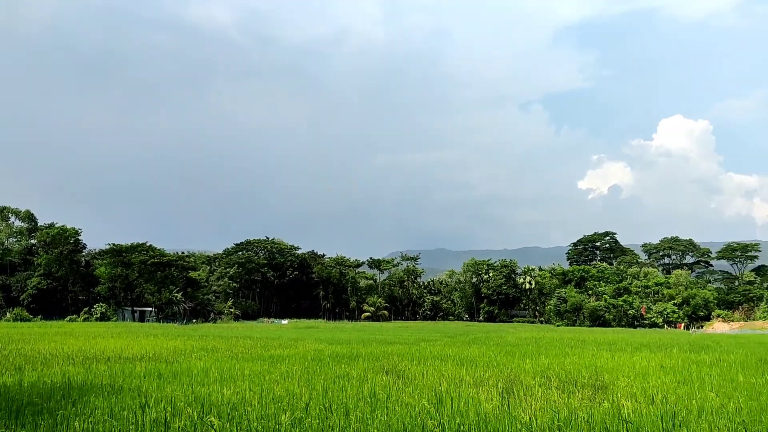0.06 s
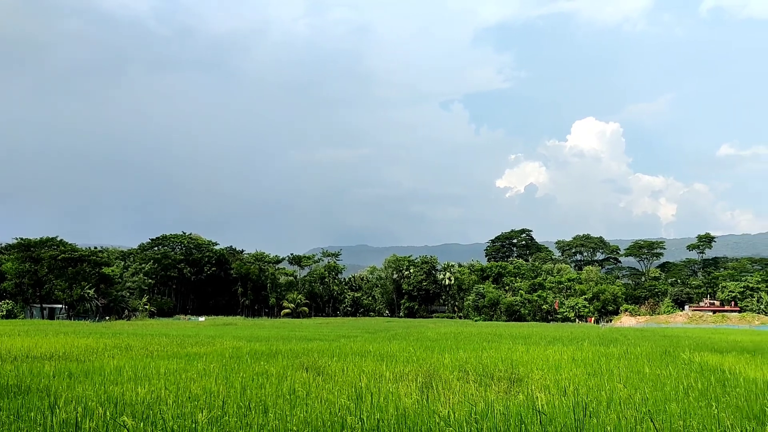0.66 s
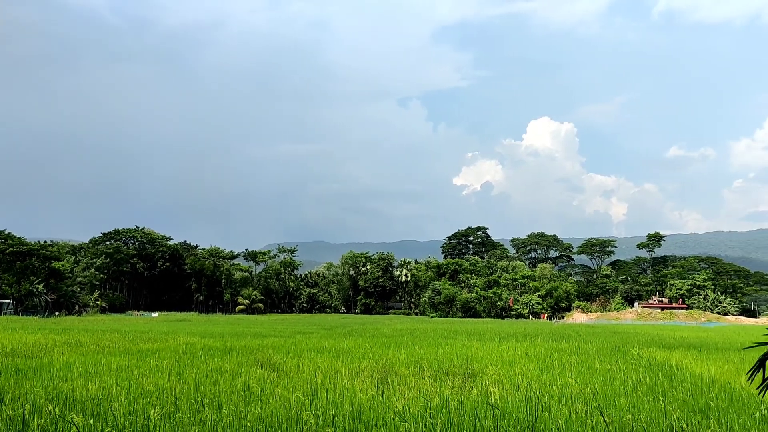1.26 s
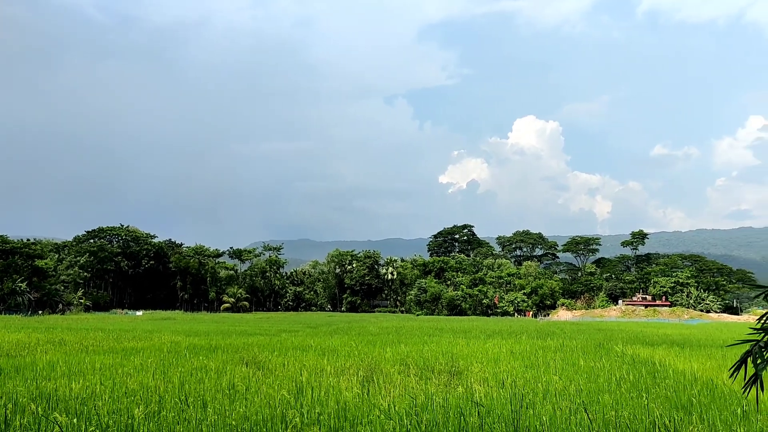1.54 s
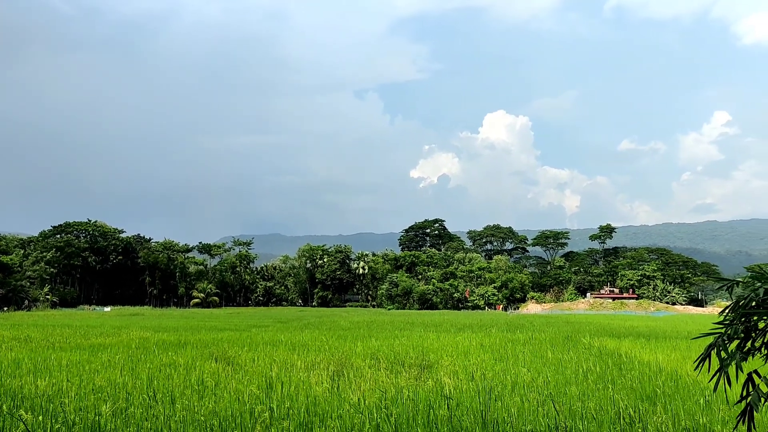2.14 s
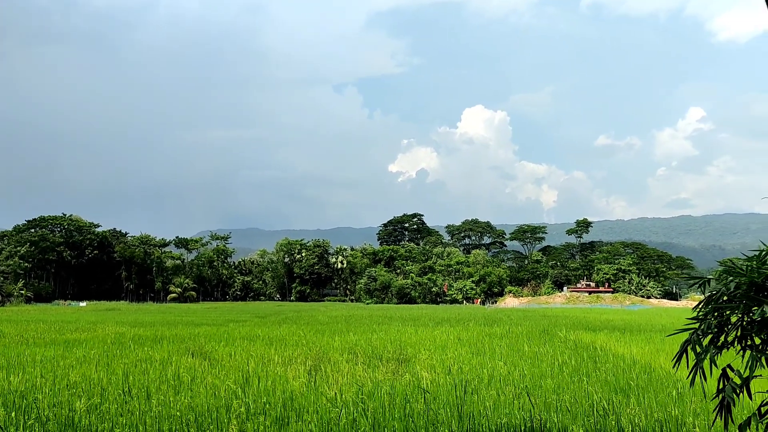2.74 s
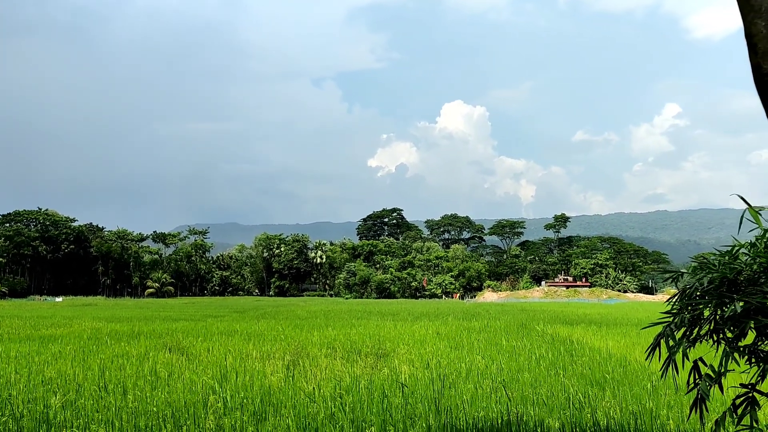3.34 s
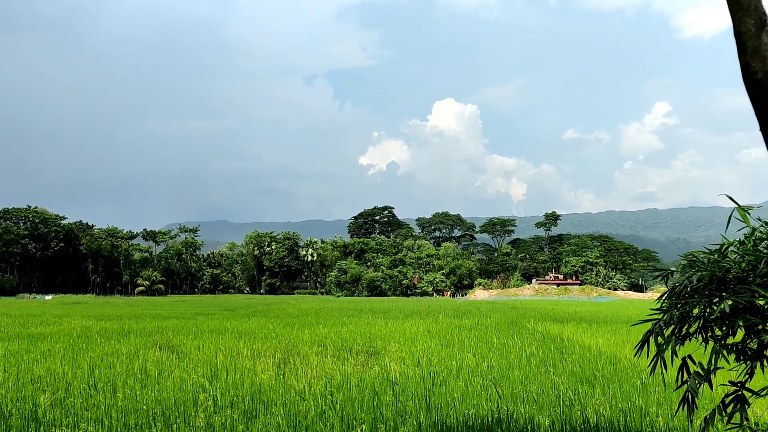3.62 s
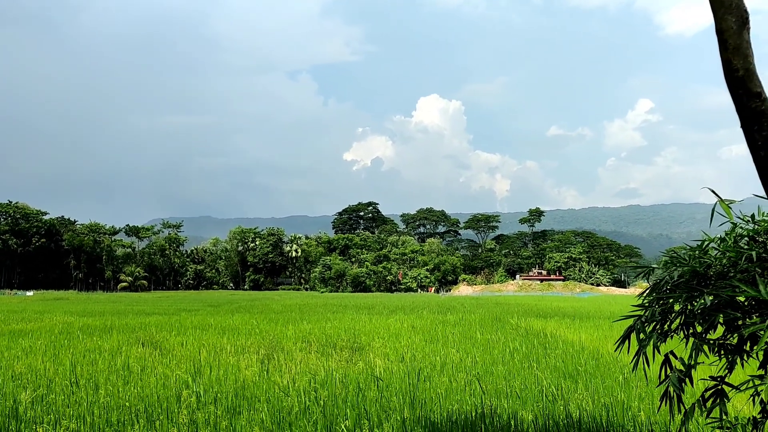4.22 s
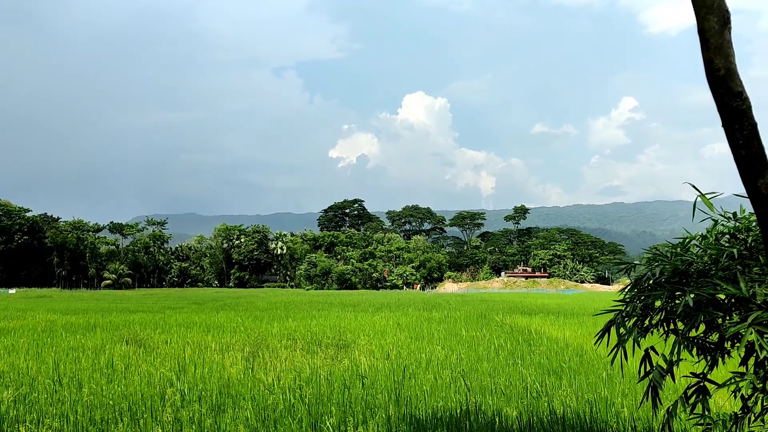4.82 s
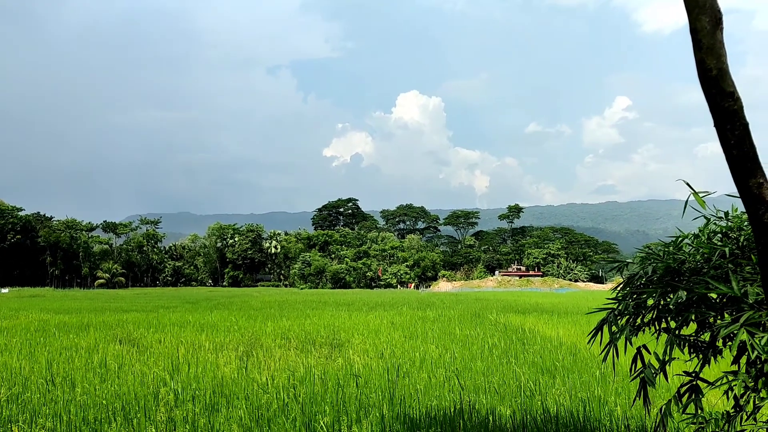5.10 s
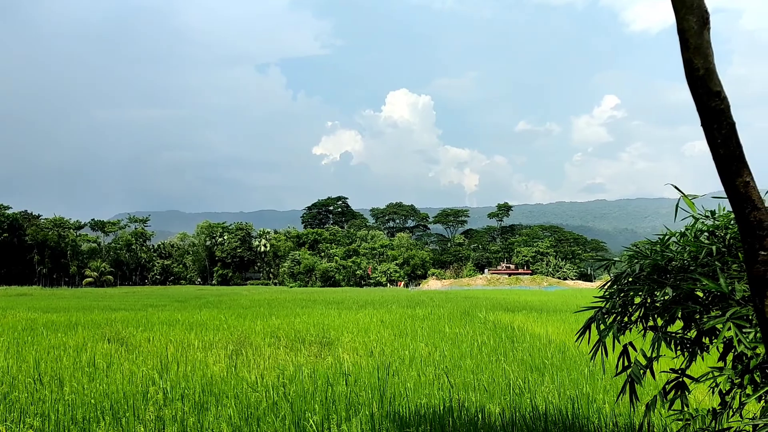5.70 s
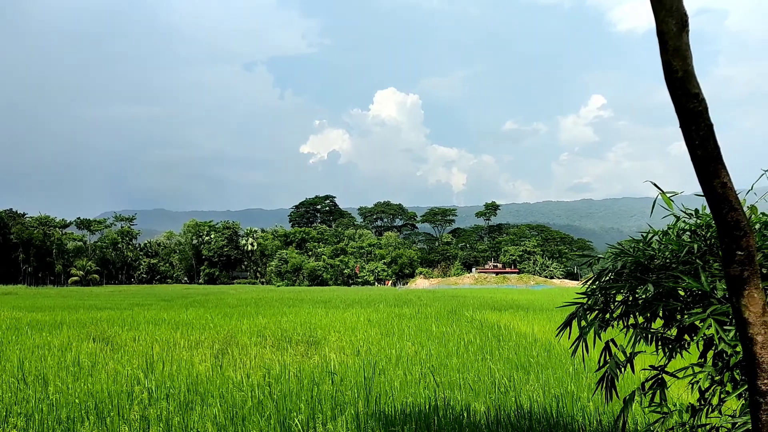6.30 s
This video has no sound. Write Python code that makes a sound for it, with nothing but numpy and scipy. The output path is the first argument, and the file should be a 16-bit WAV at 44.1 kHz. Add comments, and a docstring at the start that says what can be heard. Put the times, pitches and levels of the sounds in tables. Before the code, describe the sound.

At the edge of a rice field, wind rumbles unevenly on the microphone, swelling at the start and later thumping mostly on the left. A small bird nearby repeats quick bursts of high, rising, slightly raspy chirps, with a light echo off the trees. Underneath lie a steady country hush, the faint low drone of a far road, a soft high sizzle and faint distant bird whistles.

```python
"""Gusts rumble and thump on two microphone ports, mostly the left, at the edge of a rice field.
Under the wind lie the hush of open country, the drone of a far road and, from the tree line, a soft
sizzle and faint bird whistles. A small bird close by repeats quick bursts of upslurred, slightly
raspy chirps, which scatter off twigs, foliage and trees."""
import sys
import numpy as np
from scipy import signal
from scipy.fft import rfft, irfft, next_fast_len
from scipy.io import wavfile
from scipy.ndimage import uniform_filter1d, map_coordinates

SR = 44100
rng = np.random.default_rng(int(sys.argv[2]) if len(sys.argv) > 2 else 0)


def wav_out(sig):
    """Save sig, one row per channel (or a flat mono array), as 16-bit PCM at SR to the path in sys.argv[1]."""
    wavfile.write(sys.argv[1], SR, np.round(np.clip(np.atleast_2d(sig).T, -1, 1) * 32767).astype(np.int16))


N = 280299
TIME_S = np.arange(N) / SR

# Single eddies hitting the ports. Each row: time in seconds, left peak in dB, width in seconds,
# right minus left in dB.
EDDY_HITS = [(0.140, -20, 0.0068, -2), (0.411, -20, 0.0048, -2), (2.614, -25, 0.0023, -1),
             (2.658, -19, 0.0055, -8), (2.689, -24, 0.0022, -2), (2.904, -15.5, 0.004, -16),
             (2.924, -20, 0.0061, -15), (3.035, -13, 0.0045, -18), (3.057, -14, 0.005, -13),
             (3.079, -9, 0.0037, -19), (3.114, -14, 0.0032, -25), (3.192, -15, 0.0043, -24),
             (3.215, -14, 0.0037, -24), (3.264, -21, 0.0049, -18), (3.515, -12.5, 0.0095, -27),
             (3.542, -12.5, 0.0044, -23), (3.721, -12, 0.0029, -32), (3.765, -19.5, 0.0033, -19),
             (3.82, -24, 0.0015, -5), (3.938, -12.5, 0.0042, -28), (4.063, -13, 0.007, -19),
             (4.092, -17, 0.0047, -15), (4.146, -10, 0.0054, -28), (4.46, -13.5, 0.0054, -23),
             (4.489, -19, 0.0035, -27), (4.684, -13, 0.0076, -22)]


def from_db(db):
    return 10 ** (np.asarray(db) / 20)


def unit_rms(x):
    return x / np.sqrt(np.mean(x ** 2) + 1e-20)


def per_sample(rows):
    """Interpolate rows of (seconds, values..) to one curve per value column."""
    times_s, *columns = np.transpose(rows)
    return [np.interp(TIME_S, times_s, column) for column in columns]


def pan(left_right_db):
    """Constant-power left and right gains."""
    gains = from_db(np.array([[.5], [-.5]]) * left_right_db)
    return gains / np.sqrt(np.mean(gains ** 2, axis=0))


def coloured(x, spectrum):
    """Filter by rows of (Hz, dB), joined on a log-frequency axis."""
    hz, db = np.transpose(spectrum)
    size = next_fast_len(x.shape[-1])
    bins_hz = np.maximum(np.fft.rfftfreq(size, 1 / SR), 1)
    gain = from_db(np.interp(np.log(bins_hz), np.log(hz), db))
    return irfft(rfft(x, size) * gain, size)[..., :x.shape[-1]]


def drift(rate_hz, count):
    """Smooth random wander, spread near 1."""
    steps = np.arange(count) * rate_hz / SR
    return map_coordinates(rng.standard_normal(int(steps[-1]) + 2), [steps], order=2, mode="nearest")


def add(track, start_s, sound):
    at = round(start_s * SR)
    first, last = max(at, 0), min(at + sound.shape[-1], N)
    track[..., first:last] += sound[..., first - at:last - at]


def turbulence(spectrum, coherence):
    """Pressure noise at two ports, partly shared, held near unit power."""
    shared, *own = rng.standard_normal((3, N))
    pressure = coloured(np.sqrt(coherence) * shared + np.sqrt(1 - coherence) * np.array(own), spectrum)
    return pressure / np.sqrt(uniform_filter1d(pressure ** 2, size=SR // 7, axis=1))


def wind(rumble_trim_db=1.5, buffet_db=2.0, strong_gust_db=-28, wake_db=6.5, wake_s=0.015):
    """Large eddies rumble and small ones flutter as a gust grows, both louder at the windward port."""
    # Each row: time in seconds, gust level in dB, left minus right in dB.
    gusts = [(0.0, -28, 4), (0.56, -35.5, -4), (0.76, -33, -2), (0.88, -40.5, 4), (1.11, -36, 0),
             (1.17, -32.5, 9), (1.43, -30.5, 3), (1.53, -35.5, 0), (2.0, -37, 4), (2.3, -35, 8),
             (2.55, -34, 3), (2.68, -31.5, 4), (2.82, -36, 4), (2.91, -34.5, 10), (2.97, -34, -1),
             (3.04, -30, 15), (3.55, -26.5, 11), (3.9, -30, 8), (4.0, -31.5, 0), (4.12, -31.5, 14),
             (4.22, -32, 10), (4.39, -35, 4), (4.46, -26, 20), (4.62, -35, 8), (4.69, -27, 18),
             (4.78, -39.5, 3), (6.2, -40, 0), (6.36, -44, -6)]
    # Large-eddy spectrum. Each row: frequency in Hz, relative density in dB.
    rumble_spectrum = [(8, -23), (18, -3.5), (30, 3), (50, -4), (75, -9.5), (110, -15), (170, -30),
                       (300, -60), (700, -79.5)]
    # Small-eddy spectrum. Each row: frequency in Hz, relative density in dB.
    flutter_spectrum = [(35, 2), (80, -31), (130, -1.5), (200, -21.5), (330, -26.5), (600, -43),
                        (1500, -77)]
    gust_db, left_right_db = per_sample(gusts)
    shoves_db = buffet_db * drift(18, N)
    rumble = from_db(gust_db + rumble_trim_db + shoves_db) * turbulence(rumble_spectrum, coherence=.45)
    # Each thump comes in a brief flurry of small eddies.
    wakes = sum(np.exp(-((TIME_S - at_s) / wake_s) ** 2) for at_s, *_ in EDDY_HITS)
    flutter_db = -46.5 + 1.4 * (gust_db - strong_gust_db) + wake_db * wakes
    flutter = from_db(flutter_db) * turbulence(flutter_spectrum, coherence=.6)
    return pan(left_right_db) * (rumble + flutter)


def head_on_gust(hold_db=-28, from_s=0.17, until_s=0.52, rise_db_per_s=81, fall_db_per_s=19):
    """One gust meets both ports equally: it swells, holds and dies away."""
    # Each row: frequency in Hz, relative density in dB.
    spectrum = [(12, -9), (30, 20), (55, 1.5), (80, -3.5), (140, -1.5), (185, -6), (240, -8), (320, -18),
                (600, -29.5), (1500, -100)]
    rise_db = rise_db_per_s * np.maximum(from_s - TIME_S, 0)
    fall_db = fall_db_per_s * np.maximum(TIME_S - until_s, 0)
    return from_db(hold_db - rise_db - fall_db) * turbulence(spectrum, coherence=.8)


def country_hush(level_db=-44):
    """Distant hush, alike at both ports in the bass, diffuse in the treble."""
    # Each row: frequency in Hz, relative density in dB.
    spectrum = [(20, -4), (90, 0.5), (160, -2.5), (260, -2), (430, -7.5), (780, -10.5), (950, -16.5),
                (1200, -14), (1900, -19.5), (3100, -30.5), (4000, -36.5), (5000, -39), (8000, -42.5),
                (12000, -41.5), (15500, -44.5)]
    # Stereo width. Each row: frequency in Hz, side minus mid in dB.
    width = [(40, -38), (150, -43), (280, -10.5), (500, -5.5), (780, -5.5), (980, -2), (1300, 2.5),
             (2600, -1), (4000, 1.5), (15000, -0.5)]
    mid, side = rng.standard_normal((2, N))
    field = mid + coloured(side, width) * [[1], [-1]]
    flat_field = coloured(field, [(hz, -10 * np.log10(1 + from_db(db) ** 2)) for hz, db in width])
    return from_db(level_db) * unit_rms(coloured(flat_field, spectrum))


def far_road():
    """Only the low drone of distant engines carries across the field."""
    # Each row: time in seconds, level in dB.
    levels = [(0, -61), (2.0, -53.5), (3.5, -53.5), (5.0, -52.5), (5.7, -52.5), (6.36, -49)]
    # Each row: frequency in Hz, relative density in dB.
    spectrum = [(120, -23), (190, -3.5), (245, 3.5), (300, -1), (370, -3), (432, 6), (470, -43),
                (800, -15.5), (2000, -46)]
    return from_db(per_sample(levels)[0]) * unit_rms(coloured(rng.standard_normal(N), spectrum))


def sizzle():
    """A soft high sizzle from the tree line comes and goes, unrelated at the two ports."""
    # Each row: time in seconds, level in dB.
    levels = [(0, -72.5), (1.5, -74.5), (1.75, -80), (2.1, -84), (2.4, -72.5), (3.4, -74.5), (4.4, -73),
              (5.8, -75), (6.1, -71.5), (6.36, -77)]
    # Each row: frequency in Hz, relative density in dB.
    spectrum = [(2500, -28), (3600, 0.5), (4500, 1.5), (5200, -9), (6500, -3), (9000, -30)]
    return from_db(per_sample(levels)[0]) * unit_rms(coloured(rng.standard_normal((2, N)), spectrum))


def scatter(x, t60_s, build_s):
    """Many weak returns from leaves and trunks build up and die away."""
    t = np.arange(SR) / SR
    returns = rng.standard_normal((2, SR)) * from_db(-60 * t / t60_s) * (1 - np.exp(-t / build_s))
    returns /= np.sqrt(np.sum(returns ** 2, axis=1, keepdims=True))
    return signal.fftconvolve(x[None], returns, axes=1)[:, :N]


def far_birds(chorus_db=-68, twitter_db=-74, count=20, waver=.035):
    """Wavering, gliding calls among faint whistles and higher twitters, smeared by distance."""
    # Each row: start in seconds, length in seconds, start pitch in Hz, end pitch in Hz, level in dB.
    whistles = [(-0.06, 0.24, 1420, 1356, -57), (1.16, 0.21, 1360, 1244, -58.5),
                (6.22, 0.14, 1350, 1340, -61)]
    # Soft upslurs of small birds; columns as in whistles.
    upslurs = [(5.577, 0.21, 2600, 2850, -72), (5.88, 0.24, 2650, 3100, -71.5),
               (5.988, 0.04, 3270, 4850, -68), (6.07, 0.036, 3500, 5170, -72),
               (6.16, 0.15, 2510, 2850, -68)]
    chorus = [(when * N / SR, 0.072 + 0.11 * long, 1100 + 250 * high, 1100 + 250 * end, chorus_db)
              for when, long, high, end in rng.random((count, 4))]
    twitters = [(when * N / SR, 0.0393 + 0.078 * long, 1600 + 1300 * high, 1800 + 1300 * high,
                 twitter_db + 6 * (1 - high)) for when, long, high in rng.random((count, 3))]
    calls = np.zeros(N)
    for start_s, length_s, from_hz, to_hz, level_db in whistles + upslurs + chorus + twitters:
        along = np.linspace(0, 1, int(length_s * SR))
        hz = (from_hz + (to_hz - from_hz) * along) * (1 + waver * drift(151.4, len(along)))
        envelope = 2 * from_db(level_db) * np.sin(np.pi * along)
        add(calls, start_s, envelope * np.sin(2 * np.pi * np.cumsum(hz) / SR))
    return scatter(calls, t60_s=.4, build_s=.015)


def chirp(shelf_s, top_s, low_hz, top_hz, low_db, top_db, octave_db):
    """One raspy note: it slides along a low shelf, kinks up to the top pitch and droops as it closes."""
    flat_shelf_hz, shelf_climb_per_s, top_climb_hz_per_s = 4280, 47, 10600
    slur_share, swell_share, close_s = 0.22, 0.32, 0.0026
    droop_hz, droop_s, wander, waver = 450, 0.0026, .011, .03
    flicker_db, rasp_db, throat_hz, leak_db = 2.4, -20, 8600, -29.5
    # Noise skirts from turbulent air. Each row: offset from the note in Hz, relative density in dB.
    rasp_spectrum = [(100, -12), (400, -3), (800, -4), (1400, -5), (3000, -18), (8000, -25), (11000, -37)]
    t = np.arange(int((shelf_s + top_s + close_s / 2) * SR)) / SR
    risen = .5 + .5 * np.tanh((t - shelf_s) / (slur_share * shelf_s))
    shelf_hz = low_hz + shelf_climb_per_s * (flat_shelf_hz - low_hz) * (t - shelf_s / 2)
    crest_hz = top_hz + top_climb_hz_per_s * (t - shelf_s - top_s / 2)
    hz = shelf_hz + (crest_hz - shelf_hz) * risen - droop_hz * np.exp((t - t[-1]) / droop_s)
    # The pitch trembles most on the shelf.
    hz *= 1 + wander * drift(195, len(t)) + waver / (1 + 2 * risen) * drift(734, len(t))
    phase = 2 * np.pi * np.cumsum(hz) / SR
    ramp = np.minimum(t / (swell_share * shelf_s), (t[-1] - t) / close_s)
    opening = np.sin(np.pi / 2 * np.clip(ramp, 0, 1)) ** 2
    level = from_db(low_db + (top_db - low_db) * risen + flicker_db * drift(300, len(t)))
    rasp = from_db(rasp_db) * unit_rms(coloured(rng.standard_normal(len(t)), rasp_spectrum))
    # The throat passes the octave while the pitch is low; above that only a trace leaks through.
    octave = from_db(octave_db) / (1 + (2 * hz / throat_hz) ** 20) + from_db(leak_db)
    return np.sqrt(2) * opening * level * ((1 + rasp) * np.sin(phase) + octave * np.sin(2 * phase))


def twig_echoes(x, first_s=.002, last_s=.04, fade_s=0.015, count=14):
    """Separate early echoes off nearby leaves and branches, a different set at each port."""
    out = np.zeros((2, N))
    for port in out:
        delays_s = first_s + (last_s - first_s) * (np.arange(count) + rng.random(count)) / count
        gains = np.exp(-delays_s / fade_s) * rng.choice([-1, 1], count)
        for delay_s, gain in zip(delays_s, gains / np.linalg.norm(gains)):
            add(port, delay_s, gain * x)
    return out


def near_bird(gain_db=0.8, direct_db=-1.3, twigs_db=-7.5, foliage_db=-9.5, trees_db=-11, lag_s=.00005):
    """Chirps arrive directly and off twigs, foliage and trees; more is echo when the bird turns away."""
    # Each row: upslur time, shelf length and top length in seconds, shelf and top pitch in Hz,
    # then in dB: shelf level, top level, left minus right, octave overtone, echo send.
    chirps = [(0.034, 0.014, 0.015, 4250, 4820, -61, -64, -5, -26, 2),
              (0.085, 0.013, 0.015, 4270, 4830, -60, -65, -2, -26, -1),
              (0.286, 0.0077, 0.011, 3920, 4650, -64, -64, 0, -26, 4),
              (0.329, 0.015, 0.016, 4170, 4780, -62, -57, -5, -26, -2),
              (0.397, 0.006, 0.008, 3300.0, 4500.0, -67.0, -63.0, 3, -26, 1),
              (0.435, 0.0083, 0.01, 3680, 4800.0, -60, -60, 0, -26, 4),
              (0.475, 0.0061, 0.0082, 3860, 4810, -60, -56.5, 1, -30, 2),
              (0.563, 0.0075, 0.015, 3930, 4590, -63, -57.5, -7, -30, 1),
              (0.611, 0.014, 0.02, 4150, 4770, -54, -54.5, -7, -26, -3),
              (0.66, 0.014, 0.016, 4150, 4900, -54, -55, -7, -26, -0.5),
              (0.735, 0.026, 0.02, 3890, 4630, -57.5, -63, -2, -12, -3),
              (0.901, 0.0079, 0.013, 3580, 4670, -58, -61, -6, -26, 3),
              (0.933, 0.0069, 0.0072, 3050, 3820, -61.5, -64, -1, -26, 3),
              (0.947, 0.013, 0.018, 4150, 4720, -58, -55, -7, -26, -2),
              (0.984, 0.013, 0.013, 3850, 5200, -55.5, -55, -1, -26, 2),
              (1.026, 0.0076, 0.01, 3900, 5230, -56, -55.5, -3, -26, -1),
              (1.192, 0.0084, 0.017, 3680, 4600, -61, -60, -4, -31, 1),
              (1.239, 0.012, 0.016, 4160, 4760, -51.5, -57, -7, -23, -2),
              (1.289, 0.014, 0.019, 4150, 4880, -56, -62, -8, -26.5, -3),
              (1.429, 0.011, 0.021, 3330, 4770, -56, -53.5, -8, -13, 0),
              (1.469, 0.014, 0.02, 3800, 5060, -50, -51, -6, -28, 0.5),
              (1.513, 0.016, 0.022, 3850, 5130, -51, -53, -2, -31, 2.5),
              (2.143, 0.0069, 0.022, 3200, 4660, -56, -56.5, 5, -8, 4),
              (2.189, 0.014, 0.013, 3780, 5060, -56, -52, 3, -17, 5),
              (2.231, 0.012, 0.015, 3770, 5060, -58, -54, 7, -18, 3.5),
              (2.545, 0.011, 0.013, 3560, 4830, -58.5, -58, -3, -2.5, 6),
              (2.59, 0.02, 0.018, 4250.0, 4950, -54.5, -52.5, -2, -20, 1.5),
              (2.639, 0.015, 0.011, 4380, 5000, -53, -50.5, -4, -26, -1.5),
              (2.84, 0.006, 0.009, 3480, 4630, -69, -73.0, 5, -26, 10),
              (2.889, 0.02, 0.017, 4000.0, 4750, -68.5, -71, 8, -24, 12),
              (2.941, 0.014, 0.014, 4100.0, 4960, -70, -71, 6, -26, 9),
              (3.076, 0.012, 0.011, 3100, 4590, -60.5, -57, 2, -26, 4),
              (3.119, 0.015, 0.027, 3580, 4800, -53, -53, 1, -18, -7),
              (3.164, 0.014, 0.022, 3730, 5010, -54.5, -58.5, 1, -28, 2.5),
              (3.52, 0.0096, 0.0145, 3750, 4910, -53, -52, -6, -23, 4),
              (3.565, 0.02, 0.015, 4270, 5070, -49.5, -47.5, -5, -27, 0.5),
              (3.613, 0.018, 0.014, 4460, 5140, -48, -44.5, -5, -29, -3),
              (3.863, 0.005, 0.015, 3480, 4520, -63, -57, 1, -26, 0),
              (3.91, 0.01, 0.011, 3960, 4720, -54, -51, 6, -15, 0.5),
              (3.953, 0.015, 0.02, 3600, 4785, -54.5, -53.5, 5, -15, -0.5),
              (3.996, 0.014, 0.018, 3500, 5030, -60, -58, 8, -26, -1),
              (4.165, 0.0071, 0.0097, 3770, 4000, -69, -64, -1, -26, 0),
              (4.654, 0.0089, 0.019, 3520, 4550, -65, -60.5, 8, -26, 0),
              (4.701, 0.013, 0.019, 3960, 4700.0, -59, -61, 6, -26, -2),
              (4.748, 0.015, 0.023, 4150.0, 4700, -59, -59.5, 10, -26, -1),
              (4.915, 0.0059, 0.013, 3290, 4490, -66, -58.5, 8, -26, 0),
              (4.958, 0.014, 0.013, 3600, 4780, -59, -55, 8, -26, -4),
              (5.001, 0.015, 0.014, 3750, 5030, -57.5, -55.5, 9, -26, -2),
              (5.042, 0.0045, 0.0074, 3900.0, 4330, -66, -57, 4, -26, -11),
              (5.259, 0.012, 0.012, 3570, 4940, -55, -52, -9, -23, 2.5),
              (5.307, 0.022, 0.017, 4260, 5070, -47, -43, -9, -31, 1),
              (5.351, 0.015, 0.014, 4440, 5140, -51, -41, -8, -27, -1),
              (5.401, 0.017, 0.013, 4420, 5150, -50, -44, -5, -26, -2.5)]
    direct, send = np.zeros((2, N)), np.zeros(N)
    for at_s, shelf_s, top_s, low_hz, top_hz, low_db, top_db, pan_db, octave_db, echo_db in chirps:
        note = chirp(shelf_s, top_s, low_hz, top_hz, low_db, top_db, octave_db)
        add(direct, at_s - shelf_s, pan(pan_db) * note)
        add(send, at_s - shelf_s, from_db(echo_db) * note)
    direct[0] = np.roll(direct[0], round(lag_s * SR))   # the left port is farther from the bird
    foliage = scatter(send, t60_s=0.16, build_s=0.003)
    long_path_eq = [(3500, 5), (4500, 6.5), (5200, -3.0), (7500, 1), (10000, 3)]
    trees = coloured(scatter(send, t60_s=.44, build_s=0.018), long_path_eq)
    echoes = from_db(twigs_db) * twig_echoes(send)
    echoes += from_db(foliage_db) * foliage + from_db(trees_db) * trees
    return from_db(gain_db) * (from_db(direct_db) * direct + echoes)


def eddy_thumps():
    """A passing eddy is a pressure bump with suction before and after."""
    out = np.zeros((2, N))
    for at_s, peak_db, width_s, right_db in EDDY_HITS:
        distance_sq = ((TIME_S - at_s) / width_s) ** 2
        bump = (1 - distance_sq / 2) / (1 + distance_sq) ** 2
        out += from_db([[peak_db], [peak_db + right_db]]) * bump
    return out


def scene():
    """Birds, sizzle, hush and road, with the wind on top."""
    field = near_bird() + far_birds() + sizzle() + country_hush() + far_road()
    return field + wind() + head_on_gust() + eddy_thumps()


def record(dry):
    """Steep zero-phase low-pass."""
    cutoff_hz = 15500
    return signal.sosfiltfilt(signal.ellip(12, .05, 80, cutoff_hz, fs=SR, output="sos"), dry)


dry = scene()
out = record(dry)
wav_out(out)
```